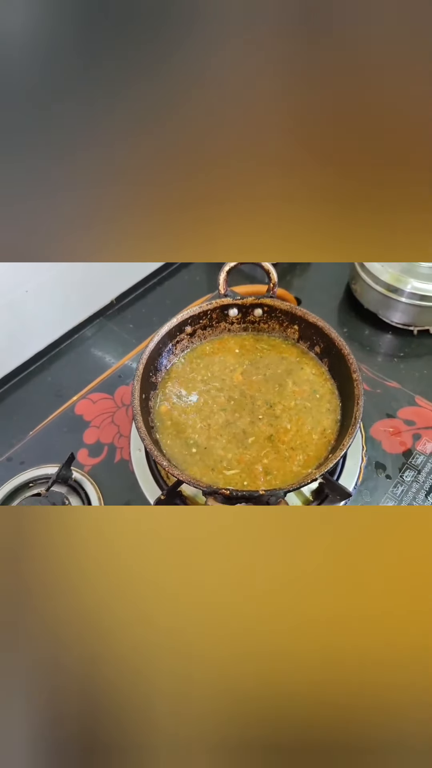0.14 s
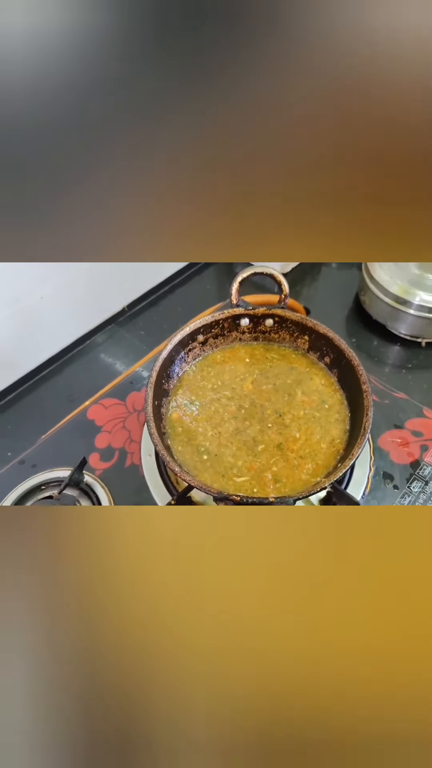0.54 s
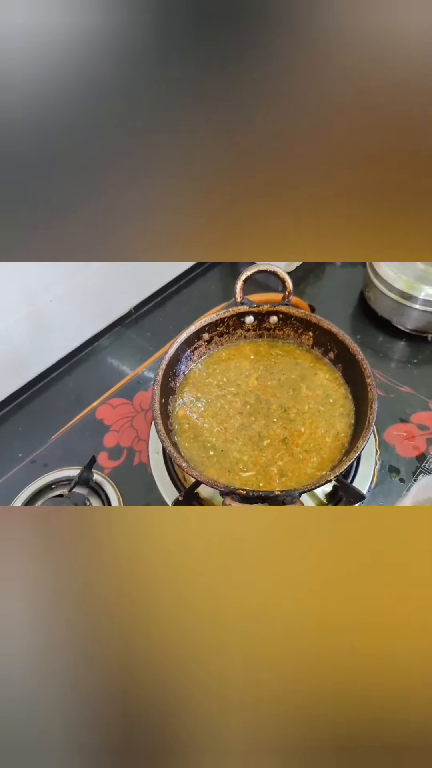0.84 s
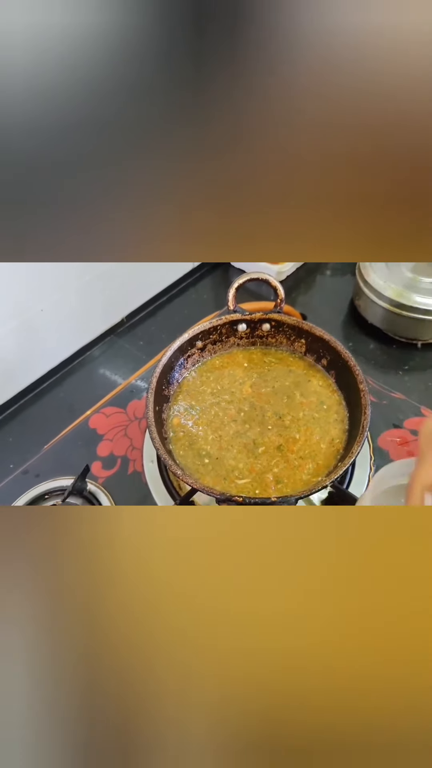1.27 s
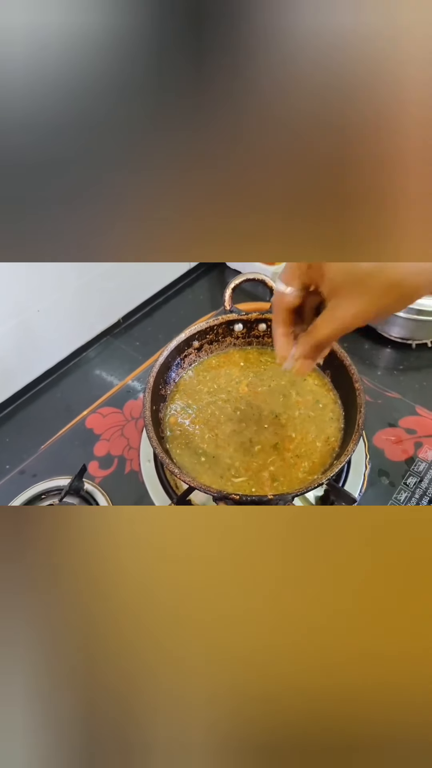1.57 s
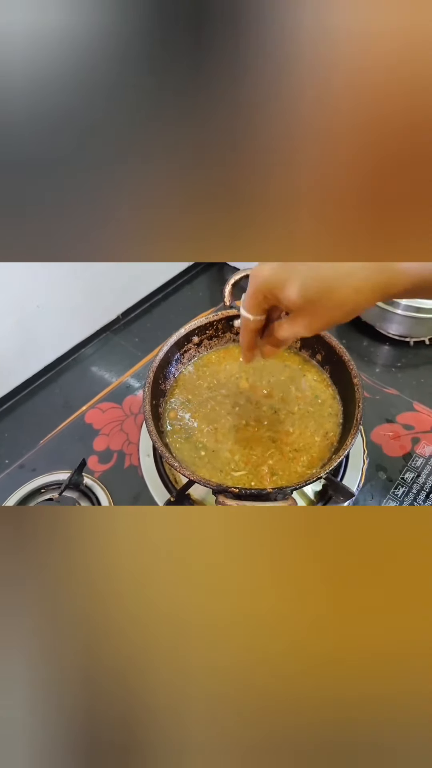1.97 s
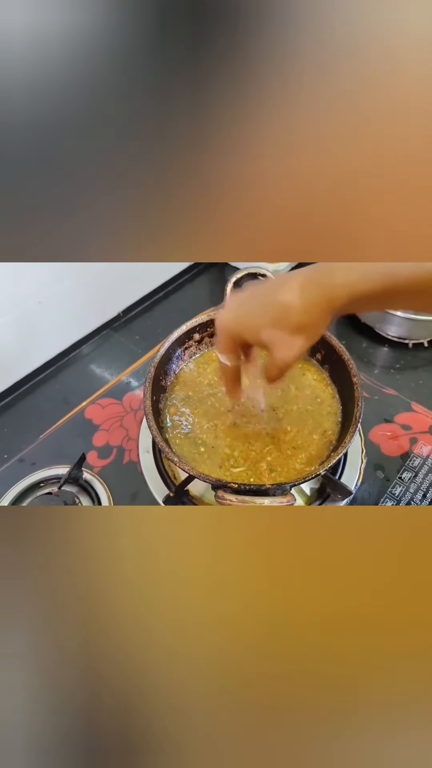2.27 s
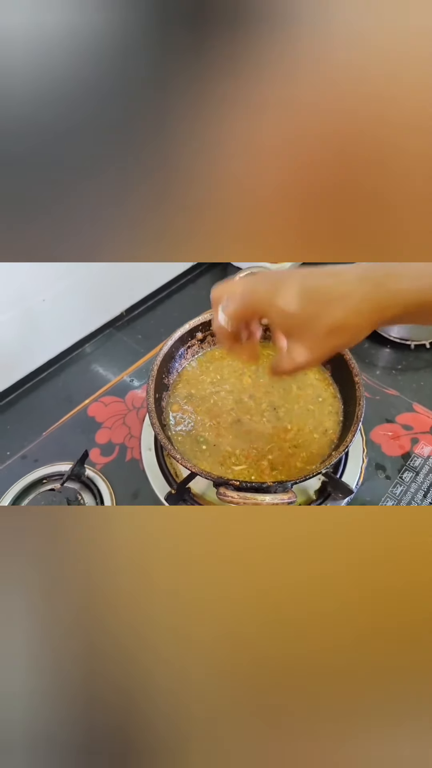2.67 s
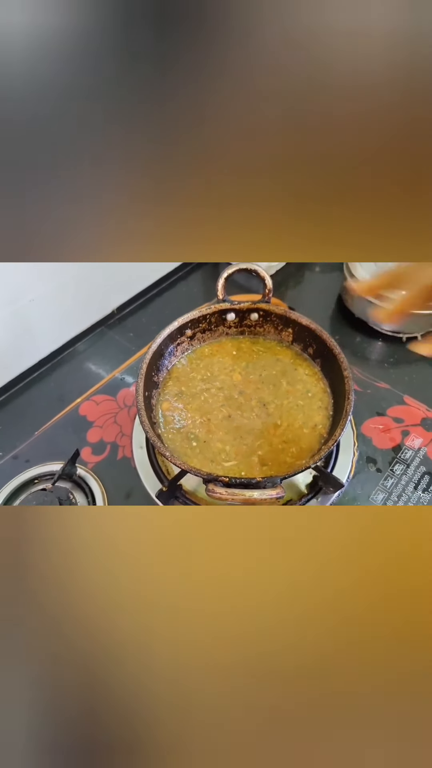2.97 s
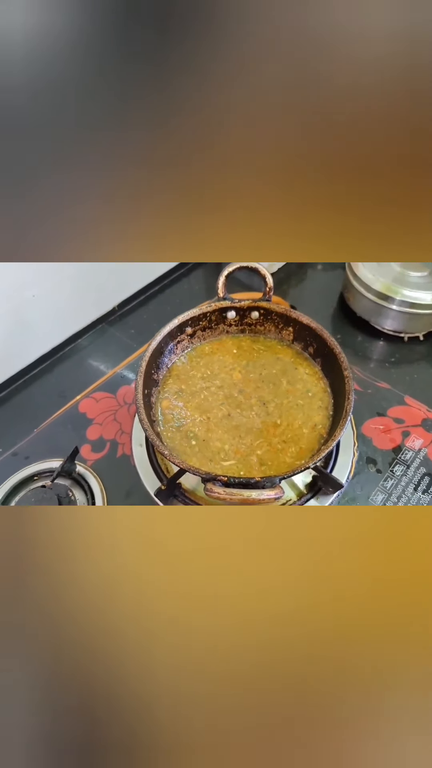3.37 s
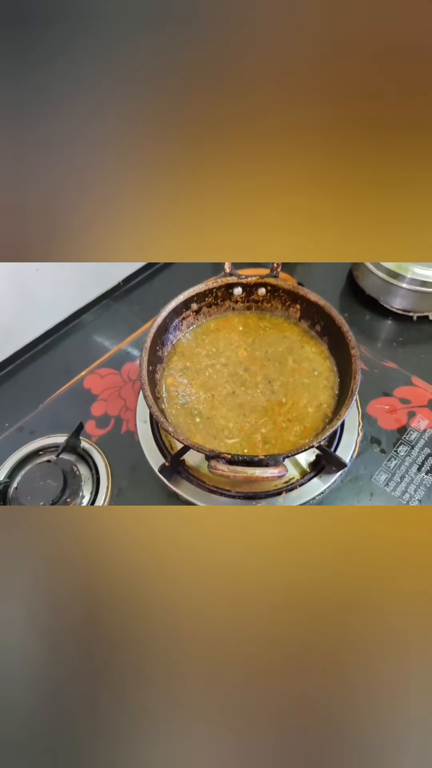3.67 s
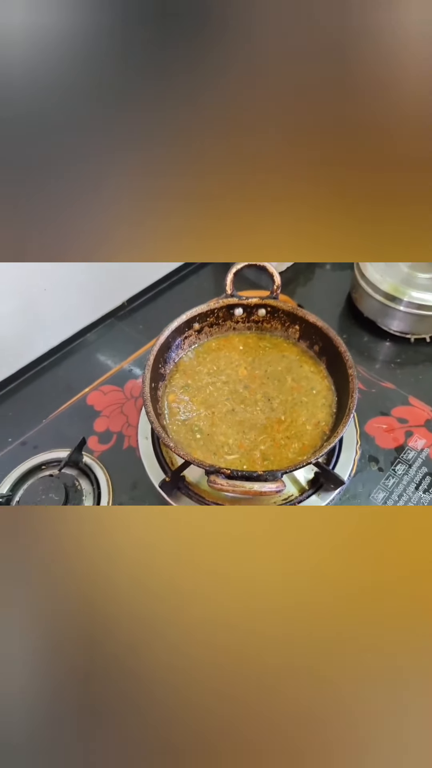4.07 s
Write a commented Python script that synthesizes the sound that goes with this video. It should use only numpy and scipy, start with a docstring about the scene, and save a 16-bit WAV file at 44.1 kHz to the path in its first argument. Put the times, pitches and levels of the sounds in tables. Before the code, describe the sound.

A gas burner hisses under simmering soup while spice grains are rummaged and rubbed between fingers, then a jar thuds onto the counter.

```python
"""A gas burner hisses and faintly whistles under a pan of simmering soup, whose bubbles thump in the
hollow stove over the low rumble of the house. In the first second a hand rummages in a spice jar:
grains crunch, tap its wall and crack, with light knocks on the counter. From 1.7 s to 3 s the fingers
rub pinches over the pan in bright, squeaky strokes; two dull scuffs follow. Just after 4 s the jar is
set down: the counter rings, the rim clicks, the grains jump, and stove and pan shake with a low boom."""
import sys
import numpy as np
from scipy import signal
from scipy.io import wavfile
from scipy.ndimage import uniform_filter1d

SR = 44100
rng = np.random.default_rng(int(sys.argv[2]) if len(sys.argv) > 2 else 0)


def put_to_file(sound):
    """Save the sound as 16-bit audio at rate SR, in the file named by the first command-line argument."""
    columns = np.atleast_2d(sound).T  # one column per channel
    safe = np.clip(columns, -1, 1)
    whole_steps = np.round(safe * 32767)
    wavfile.write(sys.argv[1], SR, whole_steps.astype(np.int16))


N = 186224
HZ = np.fft.rfftfreq(512, 1 / SR)  # bins of the noise spectra [Hz]
T = np.arange(N // 128 + 6) * 128 / SR  # their frame times [s]

# fingers stirring the jar: (time [s], level [dB])
STIRRING = [(0.0, -67), (0.122, -63), (0.14, -58), (0.27, -55), (0.376, -54.5), (0.43, -55.5),
            (0.492, -57.5), (0.56, -52.5), (0.6, -55.5), (0.66, -56), (.74, -59.5), (0.85, -70)]


def gain_of(db):
    """Decibels to a factor."""
    return 10 ** (np.asarray(db) / 20)


def unit_rms(x):
    """Scales to rms 1."""
    return x / np.sqrt(np.mean(abs(x) ** 2) + 1e-20)


def spectrum(points):
    """Spreads (frequency, value) points over the bins, on a log axis."""
    hz, value = np.transpose(points)
    return np.interp(np.log(HZ + 1), np.log(hz + 1), value)


def follow(rows, t):
    """An envelope table's columns at times t, and a gate that is open while it runs."""
    times, *columns = np.transpose(rows)
    return [np.interp(t, times, c) for c in columns], (t >= times[0]) & (t <= times[-1])


def colour(db):
    """A spectrum in dB as a magnitude of total power 1."""
    gain = gain_of(db)
    return gain / np.sqrt((gain ** 2).sum(0))


def bump(s, spread, shape=2):
    """A swell around time s: shape 1 is pointed, 2 is round."""
    return np.exp(-.5 * abs((T - s) / spread) ** shape)


def band_bursts(rows):
    """Power (bins x frames) of short, pointed noises, each around one pitch."""
    power = 0
    for s, db, hz, width, spread in rows:
        band = colour(-6 * (np.log2((HZ + 1) / hz) / width) ** 2)
        power += np.outer(band, gain_of(db) * bump(s, spread, shape=1.27)) ** 2
    return power


def resonate(x, hz, width):
    """A resonance of gain 1 that can glide: shifts hz down to zero, smooths, and shifts back."""
    turn = np.exp(2j * np.pi * np.cumsum(hz * np.ones(len(x))) / SR)
    pole = np.exp(-np.pi * width / SR)
    return 2 * (turn * signal.lfilter([1 - pole], [1, -pole], x / turn)).real


def grainy_noise(magnitude, grain_db):
    """Stereo noise shaped by a bins x frames magnitude, roughened by a fast flutter in level."""
    # diffuse sound reaches two spaced ports in and out of step: (frequency [Hz], correlation [-1 to 1])
    correlation = [(150, 1), (300, 1), (500, 0.27), (700, 0.48), (1000, 0.24), (1700, -0.29),
                   (2400, -0.022), (3200, 0.51), (3900, 0.53), (4800, -0.043), (7000, 0.095), (12500, 0.1),
                   (13400, 0.074), (15500, 1)]
    # stereo lean: (frequency [Hz], left minus right [dB])
    balance = [(400, 0), (1000, 0.5), (2500, 1.2), (5000, 1), (15000, -0.5)]
    a, b, c, d = rng.standard_normal((len(T), len(HZ), 4)).T
    alike = spectrum(correlation)[:, None]
    left = a + 1j * b
    right = alike * left + np.sqrt(1 - alike ** 2) * (c + 1j * d)
    pan = gain_of(np.outer([.5, -.5], spectrum(balance)))[:, :, None]
    shaped = signal.istft(np.array([left, right]) * magnitude * pan, nperseg=512, noverlap=384)[1]
    unit = signal.istft(left, nperseg=512, noverlap=384)[1].std() / np.sqrt(len(HZ))
    flutter = unit_rms(uniform_filter1d(rng.standard_normal(N), size=24))
    return shaped[:, :N] / unit * unit_rms(gain_of(grain_db * flutter))


def burner_hiss():
    """Gas jets and sizzle make a bright hiss in which patches of the spectrum swell and fade."""
    # tone of the hiss: (frequency [Hz], density [dB])
    tone = [(150, -7.5), (260, -12), (450, -9.5), (485, 15.5), (538, -32), (643, -8), (976, -15.5),
            (1050, -13), (1440, -9), (2180, -7.5), (4190, -3), (5480, -5.5), (7380, 0), (9510, -6),
            (12500, 0), (15000, 0), (15800, -3)]
    # its envelope: (time [s], level [dB])
    envelope = [(0.0, -45), (0.48, -42.5), (1.09, -44), (2.7, -43.5), (3.17, -44.5), (4.05, -43.5)]
    # drifting patches: (frequency [Hz], depth [dB])
    patch_depth = [(500, 3.0), (1500, 2.0), (3500, 1.6), (7000, 1.4), (15000, 1.2)]
    patches = uniform_filter1d(rng.standard_normal((len(T), len(HZ))).T, size=3, axis=0)
    patches = unit_rms(uniform_filter1d(patches, size=24, axis=1))
    (db,), _ = follow(envelope, T)
    level = gain_of(db + spectrum(patch_depth)[:, None] * patches)
    return grainy_noise(colour(spectrum(tone))[:, None] * level, grain_db=0.5)


def burner_whistle():
    """One jet whistles: a thin, very high band of noise that wanders and trembles in pitch."""
    # wander of the whistle: (time [s], pitch [Hz])
    pitch = [(0, 15330), (.3, 15360), (.8, 15340), (1.1, 15470), (1.5, 15600), (1.75, 15440), (2.05, 15620),
             (2.3, 15580), (2.45, 15640), (2.62, 15420), (2.72, 15600), (3.4, 15560), (3.75, 15480),
             (4.22, 15560)]
    # its envelope: (time [s], level [dB])
    envelope = [(0, -66), (.3, -59), (.6, -64), (.78, -55), (.9, -62), (1.3, -64), (1.5, -58), (1.7, -61),
                (2.07, -55), (2.2, -59), (2.4, -56), (2.75, -56), (3.0, -64), (3.4, -62), (3.7, -58),
                (4.22, -62)]
    t = np.arange(N) / SR
    (hz,), _ = follow(pitch, t)
    (db,), _ = follow(envelope, t)
    tremble_hz = 35 * unit_rms(uniform_filter1d(rng.standard_normal(N), size=3000))
    whistle = unit_rms(resonate(rng.standard_normal(N), hz + tremble_hz, width=25))
    return whistle * gain_of(db) * gain_of([[.1], [-.1]])


def body_drive(modes, calm_db):
    """Level and pitch ratio of one hollow body: calm simmer, bursts near its pitch, the jar's landing."""
    # calm simmer, then from 4.07 s the boom of the jar's landing: (time [s], level change [dB])
    shaking = [(0, 0), (.8, -8.5), (1.4, -9.5), (2.2, -4.5), (2.9, -5), (3.4, -11.5), (4.07, -4.5),
               (4.22, 21)]
    # bursts of bubbling: (middle [s], length [s], level [dB], favoured pitch [Hz])
    bursts = [(0.004, 0.071, -54.5, 185), (0.071, 0.035, -53.5, 293), (0.138, 0.075, -75, 91),
              (0.24, 0.63, -56.5, 105), (0.36, 0.031, -53.5, 286), (0.504, 0.14, -53.5, 296),
              (0.556, 0.035, -53, 147), (0.66, 0.05, -56, 90), (0.733, 0.16, -53.5, 303),
              (0.95, 0.21, -55, 102), (1.144, 0.15, -53, 318.6), (1.294, 0.075, -56, 101),
              (1.493, 0.038, -47.5, 246), (1.53, 0.028, -52, 92), (1.588, 0.15, -53.5, 299),
              (1.656, 0.074, -45, 84), (1.846, 0.13, -51.5, 241), (1.826, 0.043, -47, 74),
              (1.99, 0.18, -47, 72), (1.99, 0.037, -48.5, 289), (2.073, 0.093, -56, 292),
              (2.224, 0.13, -58, 268), (2.405, 0.18, -50.5, 311), (2.442, 0.094, -57, 104),
              (2.577, 0.053, -50, 182), (2.661, 0.043, -38.5, 77), (2.56, 0.052, -55, 68),
              (2.877, 0.17, -63, 64), (2.73, 0.16, -52, 272), (2.79, 0.039, -52, 100),
              (2.934, 0.059, -57, 294), (3.067, 0.013, -48.5, 306), (3.147, 0.11, -53.5, 281),
              (3.155, 0.08, -50, 95), (3.341, 0.024, -56.5, 322), (3.41, 0.11, -54.5, 278),
              (3.427, 0.048, -49, 109), (3.495, 0.04, -52, 74.4), (3.52, 0.058, -53.5, 205),
              (3.646, 0.053, -50, 110), (3.647, 0.067, -57.5, 291), (3.784, 0.11, -58, 97),
              (3.904, 0.18, -58, 79.5), (3.9, 0.098, -73, 378), (0.1, 0.12, -55, 390)]
    swell_db, wander_octaves, reach_octaves = 3.0, 0.083, 0.47
    pull = 0.64  # share of the way that the body's pitch bends towards a burst's
    body_hz = max(modes, key=lambda mode: mode[2])[0]
    swell = unit_rms(uniform_filter1d(uniform_filter1d(rng.standard_normal(len(T)), size=20), size=20))
    (shaking_db,), _ = follow(shaking, T)
    power = gain_of(calm_db + shaking_db + swell_db * swell) ** 2
    weighted_bend = wander_octaves * swell[::-1] * power
    for s, length, db, hz in bursts:
        near_db = -6 * (np.log2(body_hz / hz) / reach_octaves) ** 2
        fade_db = -5.2 * abs(2 * (T - s) / length) ** 1.19
        burst = gain_of(db + near_db + fade_db) ** 2
        power += burst
        weighted_bend += pull * np.log2(hz / body_hz) * burst
    t = np.arange(N) / SR
    return np.interp(t, T, np.sqrt(power)), np.interp(t, T, 2 ** (weighted_bend / power))


def simmer_and_boom():
    """Bubbles collapse as soft thumps that ring stove and pan; the landing jar shakes both into a boom."""
    # modes of cabinet, stove box, pan support and pan: (frequency [Hz], width [Hz], level [dB])
    bodies = [
        [(46.4, 68, -9.5), (73.1, 42, -11)],
        [(109.8, 27.5, 0)],
        [(183, 55, -1.5), (240, 88, -5)],
        [(260.3, 32, 1.5), (303.5, 24.8, 10), (330.2, 19.7, 6), (359, 15, -5), (398, 25, -5.5)],
    ]
    # quiet simmer between bursts, one per body: (level [dB])
    calm_levels = [-54.5, -68, -59.5, -63]
    thumps_per_s = 300
    out = np.zeros((2, N))
    for modes, calm_db in zip(bodies, calm_levels):
        chance, polarity, strength = rng.random((N, 3)).T
        level, bend = body_drive(modes, calm_db)
        thumps = (chance < thumps_per_s / SR) * np.sign(polarity - .5) * (1 - strength) ** -.12
        ring = 0
        for hz, width, db in modes:
            mode = resonate(thumps, hz * bend, width)
            ring += gain_of(db) * unit_rms(resonate(mode, hz * bend, 1.27 * width))
        hz, width, _ = modes[0]  # a trace of stereo width around the lowest mode
        side = unit_rms(resonate(resonate(rng.standard_normal(N), hz, 2 * width), hz, 3 * width))
        out += (unit_rms(ring) + np.outer([1, -1], hz / 27000 * side)) * level
    return out


def house_rumble():
    """The steady low rumble of the house, almost mono."""
    band = signal.butter(2, [15, 50], "bandpass", fs=SR, output="sos")
    mid, side = signal.sosfilt(band, rng.standard_normal((N, 2)).T)
    return gain_of(-61) * unit_rms(np.array([mid + 0.022 * side, mid - 0.025 * side]))


def jar_grains():
    """Grains are stirred, crunch now and then, and jump when the jar lands."""
    # tone of the stirred grains: (frequency [Hz], density [dB])
    stir_tone = [(290, -40), (500, 5), (600, -14), (687, -10), (817, 9.5), (1000, -4), (1220, 8),
                 (1460, 4.5), (1780, 0.5), (3970, -0.5), (5000, -16), (6500, -40), (11000, -120)]
    # crunches against the jar: (time [s], level [dB], centre [Hz], width [octaves], spread [s])
    crunches = [(.138, -48.5, 3460, 0.21, 0.0093), (.152, -54, 1690, 0.14, .006),
                (.232, -49, 3630, 0.24, 0.0069), (0.266, -45, 4150, 0.5, 0.0098),
                (.268, -47, 6860, .06, 0.0072), (.262, -52, 1890, .4, 0.011), (.36, -53, 4100, 0.22, 0.021),
                (.372, -47.5, 2230, 0.25, 0.011), (.465, -54, 2290, 0.04, 0.014),
                (0.565, -50.5, 3480, 0.58, 0.03), (0.577, -49, 2970, 0.074, 0.0074),
                (0.58, -44, 3760, 0.25, 0.01), (.583, -47, 2440, 0.077, 0.0093),
                (.70, -54, 3900, 0.28, .008), (4.088, -45, 6850, .12, .004),
                (4.096, -41.5, 3750, 0.054, 0.0043), (4.176, -39, 6650, .06, 0.0056),
                (4.204, -42, 6900, 0.091, 0.0043)]
    # the jump on landing: (time [s], level [dB], brightness [dB/octave])
    jump = [(4.062, -44.5, -2), (4.08, -37, -2.5), (4.09, -35.5, 1.5), (4.105, -32.5, -3), (4.13, -36.5, 0),
            (4.16, -38, -2.5), (4.18, -36.5, -0.9), (4.2, -34, 1.7), (4.23, -37, -3)]
    # tone of the jumping grains: (frequency [Hz], density [dB])
    jump_tone = [(240, -20), (400, -5.5), (481, -20), (597, -21), (700, -3), (1020, -14.5), (1670, -7),
                 (2240, -9.5), (3390, -9), (4900, -7.5), (6670, -5.5), (9500, -12.5), (15800, -9)]
    (db,), gate = follow(STIRRING, T)
    stirred = np.outer(colour(spectrum(stir_tone)), gain_of(db) * gate)
    (db, brightness), gate = follow(jump, T)
    tilt_db = np.outer(np.log2((HZ + 1) / 5000), brightness)
    jumping = colour(spectrum(jump_tone)[:, None] + tilt_db) * gain_of(db) * gate
    return grainy_noise(np.sqrt(stirred ** 2 + band_bursts(crunches) + jumping ** 2), grain_db=-0.5)


def jar_ring():
    """Stirred grains tap the wall of the jar here and there, each tap ringing one of its modes."""
    # modes of the jar wall: (frequency [Hz], width [Hz], level [dB])
    wall_modes = [(1056, 32, -11.5), (1226, 28, -7), (1300, 40, -10), (1556, 44, -10), (1770, 54, -5),
                  (2210, 55, -9), (2330, 50, -8)]
    taps_per_s = 200
    ring = np.zeros((2, SR))
    for hz, width, mode_db in wall_modes:
        chance, strength, place = rng.random((SR, 3)).T
        pan = np.array([np.cos(2 * np.pi * place), np.sin(2 * np.pi * place)])
        taps = (chance < taps_per_s / SR) * (1 - strength) ** -.2 * pan
        ring += gain_of(mode_db) * np.array([unit_rms(resonate(side, hz, width)) for side in taps])
    (db,), gate = follow(STIRRING, np.arange(SR) / SR)
    return np.pad(ring * gain_of(db) * gate, ((0, 0), (0, N - SR)))


def ticks():
    """Grains and the jar's hard rim crack: snaps of noise that die within milliseconds."""
    # cracks: (time [s], level [dB], low edge [Hz], high edge [Hz], decay [s])
    cracks = [(.2305, -38, 2500, 6000, .001), (.2658, -34, 3000, 7500, .0015),
              (.3825, -39, 1500, 6000, .001), (.574, -35, 2500, 4500, .003), (.5813, -32, 3000, 5000, .002),
              (4.0853, -23, 1000, 14500, .002), (4.0878, -27, 600, 4500, .003),
              (4.101, -28, 1500, 5000, .0015), (4.1105, -33, 3000, 7500, .002)]
    out, t = np.zeros((2, N)), np.arange(1500) / SR
    for s, db, low_hz, high_hz, decay_s in cracks:
        mid, side = rng.standard_normal((len(t), 2)).T
        band = signal.butter(2, [low_hz, high_hz], "bandpass", fs=SR, output="sos")
        crack = unit_rms(signal.sosfilt(band, np.array([mid + 0.6 * side, mid - 0.6 * side])))
        out[:, round(s * SR):][:, :len(t)] += .5 * crack * gain_of(db) * np.exp(-t / decay_s)
    return out


def counter_knocks():
    """Each blow rings the counter, most near the pitch its spot favours, until weight damps the ring."""
    # counter and jar ringing together: (frequency [Hz], level [dB], t60 [s])
    modes = [(83.7, 7, 0.45), (102.5, 10, 0.13), (193, 6.5, 0.21), (283, 6, 0.12), (359, 8.5, 0.049),
             (441, 6.5, 0.096), (495, 0.5, 0.056), (557, -7, 0.29), (636, 5.5, 0.12), (750, -6.5, 0.18),
             (823, -0.5, 0.18), (960, -6, 0.099), (1190, -1, 0.071), (2300, 4, 0.044), (2460, -5, 0.06)]
    # blows: (time [s], level [dB], favoured pitch [Hz], width [octaves], free ring [s])
    blows = [(.358, -46.5, 830, 0.22, 0.069), (.375, -50.5, 585, 0.15, .04),
             (0.746, -51.5, 493, 0.09, 0.026), (1.826, -46, 506, 0.13, 0.048),
             (3.385, -53, 503, 0.22, 0.05), (4.074, -43, 437, 0.43, 0.038), (4.0775, -33, 92, 0.22, 0.035),
             (4.085, -36, 826, 0.11, 0.04), (4.084, -34, 650, 0.82, 0.014), (4.098, -36, 228, 0.47, 0.026),
             (4.112, -44, 347, 1, 0.013), (4.1264, -30.5, 81, 0.14, 0.056), (4.137, -39, 660, 0.29, 0.036),
             (4.146, -34, 335, 0.1, 0.022), (4.165, -60, 650, 0.71, .02), (4.182, -37, 330, 0.45, .05),
             (4.172, -38.5, 745, 0.11, 0.035), (4.196, -37, 720, 0.14, .05), (4.194, -35.5, 99, 0.11, .06)]
    damping_db_per_s = 1500
    out, t = np.zeros((2, N + SR)), np.arange(SR // 2) / SR
    for s, db, centre_hz, width, free_s in blows:
        for hz, mode_db, t60 in modes:
            scatter, side = rng.standard_normal(2)
            spot_db = 1.5 * scatter - 5.5 * (np.log2(hz / centre_hz) / width) ** 2
            decay_db = 60 * t / t60 + damping_db_per_s * np.maximum(t - free_s, 0)
            attack = np.sin(np.pi / 2 * np.minimum(t * hz / 1.1, 1)) ** 2
            envelope = attack * gain_of(db + mode_db + spot_db - decay_db)
            # high modes reach left and right out of step
            phase = np.array([[1], [-1]]) * np.sign(side) * (0.036 + hz / 1800)
            out[:, round(s * SR):][:, :len(t)] += envelope * np.sin(2 * np.pi * hz * t + phase)
    return out[:, :N]


def pinches():
    """Dry grains grind and squeak between the fingers in short bright rubs; two dull scuffs follow."""
    # rubs: (time [s], level [dB], spread [s], brightness [dB/octave])
    rubs = [(1.68, -46.5, 0.027, 11), (1.85, -53, 0.15, 8), (1.99, -58, 0.017, 1), (2.39, -33.5, 0.015, 9),
            (2.581, -54, .015, 6), (2.667, -36.5, 0.017, 12.5), (2.689, -44, 0.018, 5.5),
            (2.91, -40, 0.016, 14)]
    # tone of the rubbed grains: (frequency [Hz], density [dB])
    rub_tone = [(880, -32), (1500, 12.5), (2300, 2), (3170, 0), (3570, -3), (4890, 4), (5340, 1),
                (6630, 7.5), (8150, -4.5), (14000, -4.5), (15800, -9.5)]
    # squeaks of the rubs, then two soft, dull scuffs:
    # (time [s], level [dB], centre [Hz], width [octaves], spread [s])
    squeaks_and_scuffs = [(1.69, -49, 7100, 0.11, 0.0061), (2.368, -40, 13800, 0.07, .006),
                          (2.381, -58, 6500, 0.043, .005), (2.391, -44, 4920, 0.044, 0.0045),
                          (2.398, -45.5, 6140, .04, 0.0082), (2.416, -51, 6350, .03, .012),
                          (2.693, -44.5, 6440, 0.073, .005), (1.83, -54.5, 7300, 0.2, 0.096),
                          (3.39, -54.5, 1730, 0.93, 0.016), (3.53, -53, 1940, 1, 0.017)]
    power, octaves = band_bursts(squeaks_and_scuffs), np.log2((HZ + 1) / 8000)
    for s, db, spread, brightness in rubs:
        tone_db = spectrum(rub_tone) + brightness * octaves
        rub = np.outer(colour(tone_db), gain_of(db) * bump(s, spread))
        # every rub sits in a brighter, softer, longer rustle
        rustle = np.outer(colour(tone_db + 2.5 * octaves), gain_of(db - 4) * bump(s, 2.5 * spread))
        power += rub ** 2 + rustle ** 2
    return grainy_noise(np.sqrt(power), grain_db=1.8)


def scene():
    """The stove as a bed, the spice handling on top and the house underneath."""
    stove = burner_hiss() + burner_whistle() + simmer_and_boom()
    spice = jar_grains() + jar_ring() + pinches() + counter_knocks() + ticks()
    return stove + spice + house_rumble()


def record(dry):
    """The microphone's bass roll-off, then a steep cut of the highest treble."""
    low_cut_hz, high_cut_hz = 52, 15760
    thinned = signal.sosfilt(signal.butter(2, low_cut_hz, "highpass", fs=SR, output="sos"), dry)
    high_cut = signal.firwin(2047, high_cut_hz, window=("kaiser", 9), fs=SR)
    return signal.oaconvolve(thinned, high_cut[None], "same")


dry = scene()
out = record(dry)
put_to_file(out)
```